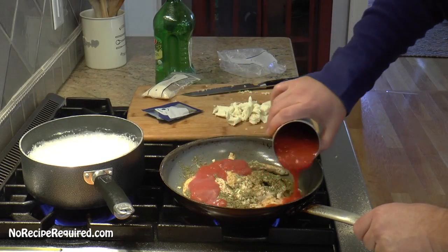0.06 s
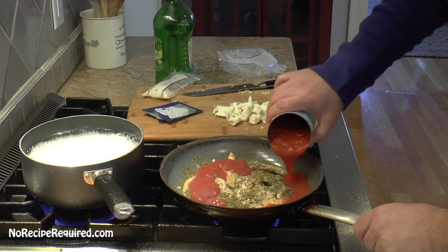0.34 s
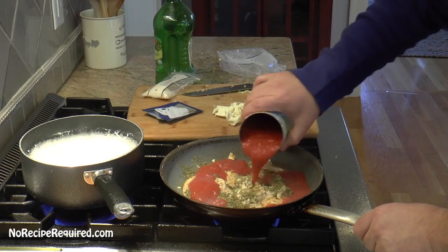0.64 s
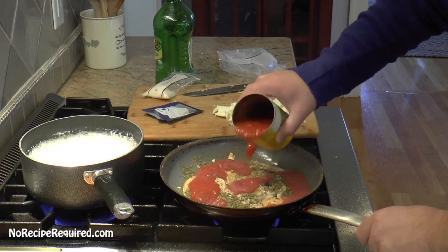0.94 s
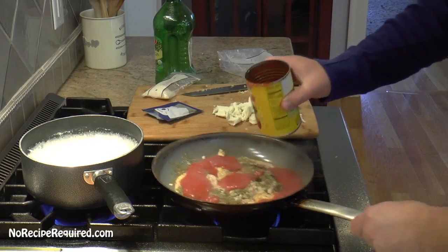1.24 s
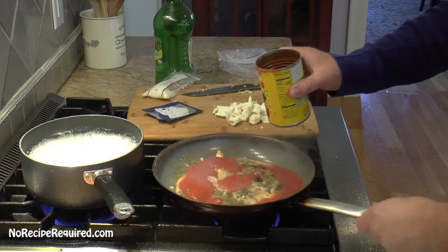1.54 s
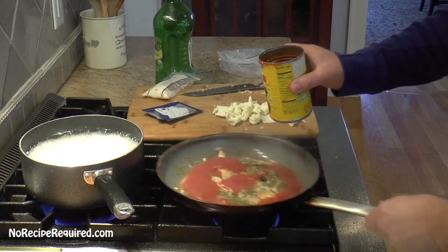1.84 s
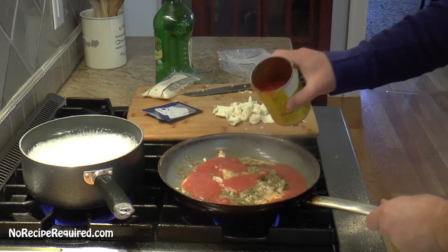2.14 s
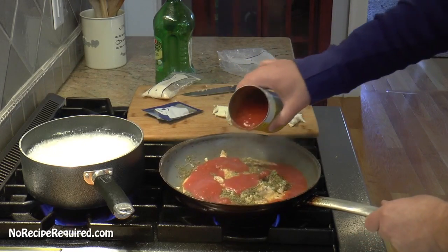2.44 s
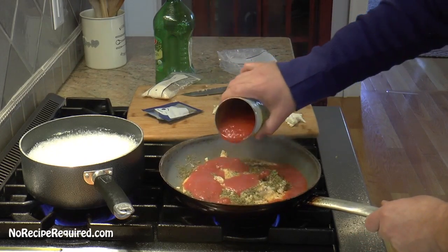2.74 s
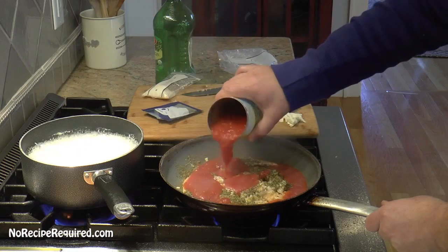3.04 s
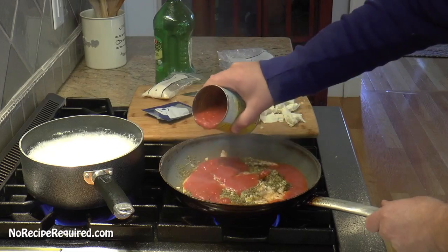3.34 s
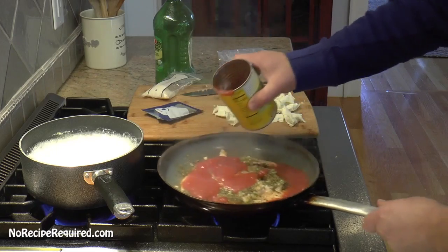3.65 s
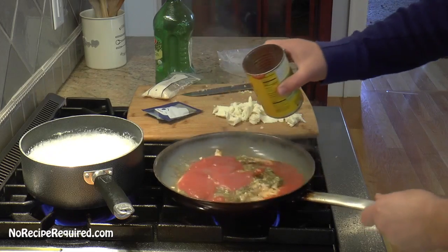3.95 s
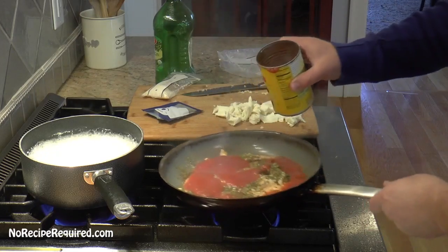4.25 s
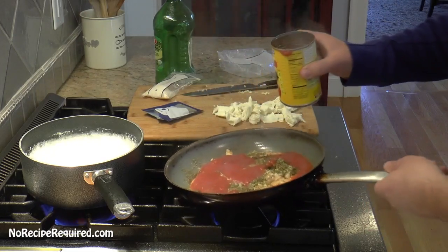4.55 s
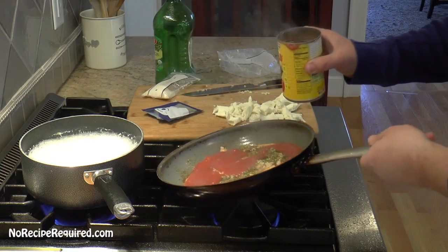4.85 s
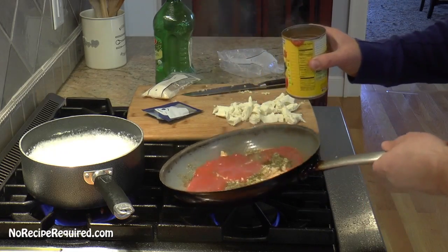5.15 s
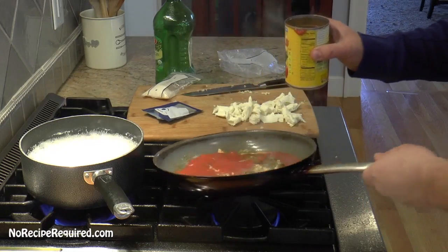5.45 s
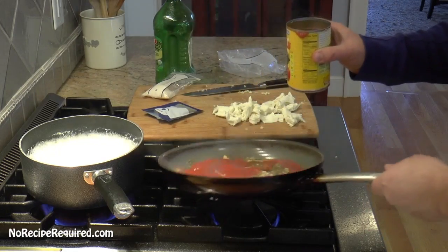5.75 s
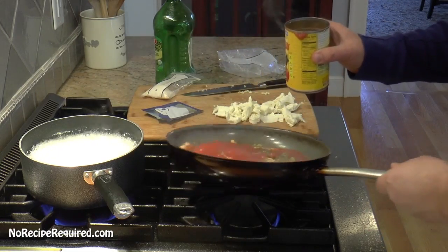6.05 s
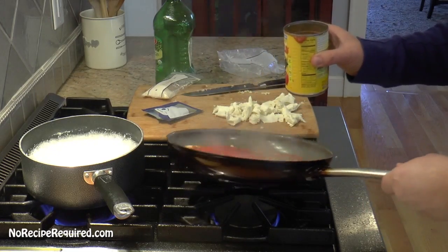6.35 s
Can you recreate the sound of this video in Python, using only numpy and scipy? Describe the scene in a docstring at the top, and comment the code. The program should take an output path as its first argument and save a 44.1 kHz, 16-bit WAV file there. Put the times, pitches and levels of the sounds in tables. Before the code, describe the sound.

A crackling sizzle of tomato pulp in hot oil dips and revives, with faint bubbling and a few metal pan knocks.

```python
"""Tomatoes in a hot skillet

Crushed tomatoes are poured twice into hot oil, beside a pot on the boil. Water flashes to steam, and
countless tiny bubbles hiss and crackle; the sizzle sinks as the pulp cools the metal and revives on
fresh hot oil. Shifted and tilted, the skillet knocks on the burner grate and rings in damped modes.
A faint hum fills the small kitchen."""
import sys
import numpy as np
from scipy import signal
from scipy.fft import rfft, irfft
from scipy.io import wavfile
from scipy.ndimage import uniform_filter1d

SR = 44100
rng = np.random.default_rng(int(sys.argv[2]) if len(sys.argv) > 2 else 0)


def transcribe(signal):
    """Save signal, clipped to [-1, 1], as a 16-bit WAV file at the path in sys.argv[1]."""
    frames = np.atleast_2d(signal).T
    limited = np.clip(frames, -1, 1)
    pcm = np.round(limited * 32767).astype(np.int16)
    wavfile.write(sys.argv[1], SR, pcm)


N = 282240
TIME, FREQS = np.arange(N) / SR, np.fft.rfftfreq(N, 1 / SR)
FRAMES, BINS = np.arange(N // 128 + 5) * 128 / SR, np.fft.rfftfreq(512, 1 / SR)  # short-time grid: s, Hz

# Strength of the sizzle, sinking under cold pulp and reviving on hot oil: time_s, level_db
SIZZLE_LEVEL = [(0.0, -33.4), (0.4, -32.3), (0.7, -33.2), (1.6, -33.8), (1.7, -35.4), (2.06, -34.7),
                (2.22, -36.7), (2.62, -38.1), (2.72, -35.5), (3.02, -37.7), (3.27, -40.6), (3.325, -35.4),
                (3.72, -34.3), (4.78, -34.5), (4.85, -35.3), (5.92, -35.4), (6.03, -33.5), (6.4, -33.9)]
# Spectrum of the bursting bubbles: frequency_hz, level_db
HISS_SPECTRUM = [(1200, -6), (1700, -5), (2200, -2.5), (2700, -0.5), (3600, -2), (4300, -2.5), (5500, -2),
                 (7300, -5.5), (8000, -4.5), (9900, -6), (11000, -10), (13300, -17.5), (15700, -20)]
# Resonances and dips of the skillet's bowl: centre_hz, width_hz, gain_db
BOWL_RESONANCES = [(1530, 140, -3), (2480, 100, -1.5), (2730, 250, 0), (3080, 230, -1), (3560, 400, 2.9),
                   (4170, 250, -1), (4710, 130, 3), (5470, 290, -2.5), (7150, 840, 2.5), (8170, 600, -1)]
# Puffs of fine spray as the pulp spreads or slides: centre_s, treble_boost_db, half_width_s
SPRAY_PUFFS = [(.19, 4.5, .08), (5.15, 2.3, .17)]
def sizzle():
    """Vaporisation: steam bubbles burst in the oil and sum to a crackling hiss, coloured by the bowl."""
    t = FRAMES[:, None]
    fresh = freshness(t)
    colour = amp(read(HISS_SPECTRUM, BINS) + humps(BOWL_RESONANCES, BINS))
    colour *= highpass(BINS, edge_hz=1530, order=5)
    colour /= band_rms(colour, low_hz=2500, high_hz=10000)
    # large wet bubbles sound low, the finest spray at the very top
    large = read([(4000, .87), (4800, 0)], BINS)
    fine = read([(9500, 0), (12500, 1)], BINS)
    muffle_db, sputter_db, spray_db = -.55 * fresh, .7 * fresh, 1.2 * fresh - .5
    spray_db += sum(db * np.exp(-((t - s) / width) ** 2) for s, db, width in SPRAY_PUFFS)
    level_db = np.interp(t, *np.transpose(SIZZLE_LEVEL)) + muffle_db
    field_db = level_db + large * sputter_db + fine * spray_db
    field_db += 1.07 * patches(frames=12, bins=4)  # bubbles cluster by size
    field_db += .45 * patches(frames=10, bins=120)  # the whole pan flutters
    crackle = amp(-3.5) * bursts(per_s=5500, spread_db=2.8)
    pops = amp(-21) * bursts(per_s=45, spread_db=3.5)
    bubbles = unit(rng.standard_normal(N) + crackle + pops)
    return sound_field(bubbles, colour * amp(field_db - .35))


def freshness(t, fresh_s=1.2, settle_s=.18):
    """Logistic decay: near 1 while the first pulp is fresh on the oil, falling to 0 as it settles."""
    return 1 / (1 + np.exp((t - fresh_s) / settle_s))


def squeals(settled_per_s=7, fresh_per_s=80):
    """Orifice tones: steam forced through pinholes in the pulp sings briefly at random pitches."""
    per_s = settled_per_s + fresh_per_s * freshness(TIME)
    times = TIME[rng.random(N) < per_s / SR]
    height, size, span = rng.random((len(times), 3)).T
    pitch_hz = 2300 + 12800 * height ** 1.3
    level_db = -44 + .5 * read(HISS_SPECTRUM, pitch_hz) + 3 * (2 * size - 1)
    half_length_s = .008 + .022 * span
    return swarms(zip(times, level_db, pitch_hz, half_length_s), relative_width=.012)


# The strongest spurts of steam: centre_s, level_db, pitch_hz, half_length_s
STEAM_SPURTS = [(.02, -35, 2470, .034), (.335, -35.5, 2960, .025), (.38, -38.5, 3940, .06),
                (.46, -37, 3900, .05), (.962, -32.5, 2780, .03), (1.08, -37, 2920, .02),
                (1.2, -39, 2680, .046), (1.38, -38, 2850, .025), (3.9, -40, 3470, .062)]
def spurts(per_s=4, level_db=-40.5, pitch_hz=2800, half_length_s=.02):
    """Pressure release: steam escapes from under the pulp, with lesser random spurts while it is fresh."""
    times = TIME[rng.random(N) < per_s * freshness(TIME) / SR]
    lesser = [(s, level_db, pitch_hz * 2 ** rng.uniform(-.2, .2), half_length_s) for s in times]
    return swarms(STEAM_SPURTS + lesser, relative_width=.098)


# Pulp landing in the pan: centre_s, relative_level_db, pitch_hz, half_length_s
PULP_LANDINGS = [(.618, -40, 1000, .025), (.71, -45.5, 1090, .14), (.83, -48, 870, 0.14),
                 (1.3, -47, 1340, 0.076)]
def splats():
    """Soft impact: each landing of pulp gives a short, broad band of noise."""
    return amp(1.6) * swarms(PULP_LANDINGS, relative_width=.25)


# Modes of the skillet on the grate: pitch_hz, level_db, t60_s
SKILLET_MODES = [(277, -4.5, 0.094), (303, -2.5, 0.11), (472, -5.5, 0.15), (520, -5.5, 0.13),
                 (576.5, -3, .13), (640.6, -3.5, .11), (690, -1, .12), (762, -2.5, 0.087),
                 (814.6, -1, 0.11), (922, -1, 0.054), (1078, -6, 0.053), (1243, -11.5, .07),
                 (1394, -14, 0.058)]
# Contacts with the grate: start_s, relative_level_db, hardness_db, rebound_gain_db
GRATE_CONTACTS = [(1.429, -32.5, -24, 2), (1.632, -33.5, 12, 1), (1.723, -24, 4, -16),
                  (1.970, -29.7, -3, 1), (3.796, -34.7, -18, -1), (3.894, -32, -12, -3),
                  (4.984, -38, -16, -6), (5.064, -31, -22, 2), (5.112, -18.3, -25, -2.5),
                  (5.211, -18.3, -28, -13), (5.754, -25.5, -14, -15)]
def knocks(usual_hardness_db=-18.5, chatter_s=.018):
    """Modal ringing: the skillet strikes, bounces twice and chatters; hard contact favours high modes."""
    out, t = np.zeros(N), TIME[:SR // 3]
    hz, mode_db, t60 = np.transpose(SKILLET_MODES)[:, :, None]
    attack = 1 - np.exp(-t / .0015)
    for s, db, hardness_db, rebound_db in GRATE_CONTACTS:
        harder_db = hardness_db - usual_hardness_db
        tilt_db = .71 * harder_db * np.log2(np.maximum(hz / 700, 1))
        contact_hz = 600 * 2 ** (.036 * harder_db)
        contact_db = 3 * np.exp(-(np.log(hz / contact_hz) / .3) ** 2)
        decays = amp(mode_db + tilt_db + contact_db - 60 * t / t60)
        # a harder contact rebounds for longer; the last bounce is shorter and weaker
        gap_s = .0225 + .00033 * harder_db
        landings = [(0, db), (gap_s, db + rebound_db), (1.8 * gap_s, db + rebound_db - 8)]
        for delay_s, blow_db in landings:
            modes = decays * np.sin(2 * np.pi * (hz * t + rng.random(hz.shape)))
            ring = modes.sum(0) * attack
            chatter = .37 * impulses(len(t), per_s=600) * np.exp(-t / chatter_s)
            blow = ring + signal.fftconvolve(ring, chatter)[:len(t)]
            add(out, s + delay_s, amp(blow_db - 9) * blow / np.std(blow[:SR // 50]))
    # the small pan radiates almost no deep bass
    radiated = signal.sosfilt(signal.butter(3, 200, "high", fs=SR, output="sos"), out)
    return kitchen(radiated, t60_s=.22, wet_db=-13)


# The stove top takes the skillet's weight: time_s, peak_db
STOVE_THUDS = [(2.011, -45), (5.118, -29.5)]
def thuds(pitch_hz=240, length_s=.0162):
    """Heavy damping: the loaded stove top swings for only a few cycles."""
    out, swell = np.zeros(N), np.hanning(int(length_s * SR))
    push = np.sin(2 * np.pi * pitch_hz * TIME[:len(swell)]) * swell
    for s, db in STOVE_THUDS:
        add(out, s - length_s / 4, amp(db) * push)
    return kitchen(out, t60_s=.15, wet_db=-18)


# Strength of the boiling pot and simmering pulp: time_s, relative_level_db
SIMMER_LEVEL = [(0, -46.5), (1.0, -45), (1.95, -46), (2.25, -50), (2.85, -49), (3.2, -52), (3.85, -43.7),
                (4.85, -47.5), (6.4, -46)]
# Spectrum of the bubbling and the burners: frequency_hz, level_db
BOIL_SPECTRUM = [(18, -66), (30, -40), (91, -21.5), (106, -22), (120, -8), (152, -10.5), (236, -7),
                 (284, -1), (425, -5), (558, -0.5), (617, -3.5), (808, 0), (880, -4.5), (1040, 0.5),
                 (1700, -2), (2210, -24), (3740, -120)]
# Resonances of the pot and stove top: centre_hz, width_hz, gain_db
POT_RESONANCES = [(297, 56, 2), (468, 19, 2.5), (567, 28, 3), (686, 50, 5), (824, 40, 4.5), (940, 35, 3),
                  (1023, 32, 2.5), (1190, 56, 4), (1415, 29, 8.5)]
def simmer():
    """Resonant filtering: the pot colours low bubbling and the rush of the burners."""
    colour = amp(read(BOIL_SPECTRUM, FREQS) + humps(POT_RESONANCES, FREQS))
    colour /= 1 + (FREQS / 1650) ** 10
    bubbles = unit(rng.standard_normal(N) + amp(-7) * bursts(per_s=260, spread_db=3))
    direct, diffuse = (unit(irfft(rfft(v) * colour, N)) for v in (bubbles, rng.standard_normal(N)))
    stereo = direct + amp(-14.5) * np.array([diffuse, -diffuse])
    return stereo * amp(np.interp(TIME, *np.transpose(SIMMER_LEVEL)) - .64)


def hum(pitch_hz=125.5, waver_hz=3.43, level_db=-72.5):
    """Modulation: a faint tone wavers in pitch, and sinks and swells with the low bubbling."""
    waver = np.interp(TIME, FRAMES, patches(frames=40, bins=1)[:, 0])
    tone = unit(np.sin(2 * np.pi * np.cumsum(pitch_hz + waver_hz * waver) / SR))
    simmer_db = np.interp(TIME, *np.transpose(SIMMER_LEVEL))
    return amp(level_db + 1.1 * (simmer_db - simmer_db.mean())) * tone


def reflections(x, count):
    """Comb filtering: faint echoes off the hob, pot and wall ripple the spectrum."""
    delay_s = rng.uniform(.002, .012, (count, 1))
    comb_db = .9 * unit(np.cos(2 * np.pi * FREQS * delay_s).sum(0))
    return irfft(rfft(x) * amp(comb_db), N)


def kitchen(x, t60_s, wet_db):
    """Reverberation: a small hard room adds a short tail, partly shared by left and right."""
    t = TIME[:SR // 2]
    echoes = impulses((3, len(t)), per_s=2000) * (t > .004)
    tails = (echoes[:2] + echoes[2]) * amp(-60 * t / t60_s)
    tails /= np.linalg.norm(tails[0])
    return x + amp(wet_db) * signal.fftconvolve(x[None], tails, axes=1)[:, :N]


# Likeness of the sizzle at left and right: frequency_hz, coherence
COHERENCE = [(60, .75), (250, .93), (1400, .85), (2100, .99), (4200, .994), (5400, .999), (6800, .997),
             (9000, .985), (12700, .97), (14000, .45)]
def sound_field(source, gain):
    """Partial coherence: direct sound and diffuse noise form a stereo pair under one moving spectrum."""
    window = dict(nperseg=512, noverlap=384)
    direct, diffuse = (signal.stft(np.pad(v, (0, 1024)), **window)[2].T[:len(FRAMES)]
                       for v in (source, rng.standard_normal(N)))
    coherence = np.clip(read(COHERENCE, BINS), 0, 1)
    mid, side = direct * np.sqrt((1 + coherence) / 2), diffuse * np.sqrt((1 - coherence) / 2)
    spectra = np.array([mid + side, mid - side]) * gain
    return signal.istft(spectra.transpose(0, 2, 1), **window)[1][:, :N]


def swarms(rows, relative_width):
    """Superposition: bubbles ringing near one pitch sum to a band of noise that swells and fades."""
    out = np.zeros(N)
    for centre_s, level_db, pitch_hz, half_length_s in rows:
        swell = np.hanning(int(2 * half_length_s * SR))
        hz = np.fft.rfftfreq(len(swell), 1 / SR)
        band = np.exp(-((hz / pitch_hz - 1) / relative_width) ** 2)
        swarm = irfft(rfft(rng.standard_normal(len(swell))) * band, len(swell))
        add(out, centre_s - half_length_s, amp(level_db) * unit(swarm) * swell)
    return out


def bursts(per_s, spread_db):
    """Shot noise: bubbles burst at random, in many small clicks and a few large."""
    size = amp(spread_db * np.minimum(rng.exponential(1, N), 4.5)) * rng.choice([-1, 1], N)
    return unit(size * (rng.random(N) < per_s / SR))


def impulses(shape, per_s):
    """Poisson train of impulses with Gaussian heights."""
    return rng.standard_normal(shape) * (rng.random(shape) < per_s / SR)


def patches(frames, bins):
    """Random field of rms 1, smoothed over time and frequency."""
    field = uniform_filter1d(rng.standard_normal((len(FRAMES), len(BINS))), frames, axis=0)
    return unit(uniform_filter1d(field, bins, axis=1, mode="wrap"))


def humps(resonances, hz):
    """Decibels that resonances add to a spectrum."""
    return sum(db * np.exp(-(2 * (hz - centre) / width) ** 2) for centre, width, db in resonances)


def highpass(hz, edge_hz, order):
    """Gain of a maximally flat high-pass."""
    return 1 / np.sqrt(1 + (edge_hz / (hz + 1)) ** (2 * order))


def band_rms(gain, low_hz, high_hz):
    """Rms within a band of unit noise filtered by gain."""
    return np.sqrt(np.mean(gain ** 2 * (BINS > low_hz) * (BINS < high_hz)))


def read(points, hz):
    """Interpolation on a log-frequency axis."""
    point_hz, value = np.transpose(points)
    return np.interp(np.log(hz + 1), np.log(point_hz + 1), value)


def amp(db):
    """Decibels to gain."""
    return 10 ** (np.asarray(db) / 20)


def unit(x):
    """Normalisation to rms 1."""
    return x / np.sqrt(np.mean(x ** 2) + 1e-20)


def add(mix, start_s, sound):
    """Sums a sound into the mix."""
    part = mix[max(round(start_s * SR), 0):][:len(sound)]
    part += sound[:len(part)]


def scene():
    """Superposition: all the sources add, nearly straight ahead on the stove."""
    frying = splats() + reflections(sizzle(), count=24) + squeals()
    return frying + simmer() + spurts() + knocks() + thuds() + hum()


# Level of the left channel over the right: frequency_hz, difference_db
LEVEL_DIFFERENCE = [(50, -1), (110, -3.2), (250, -3), (500, 1), (950, 2.5), (1500, 1.8), (2100, .1),
                    (3100, .7), (5300, 0), (7500, .1), (9500, 2.4), (12000, 3), (14500, 5)]
# Phase of the left channel ahead of the right: frequency_hz, lead_rad
PHASE_DIFFERENCE = [(0, -0.14), (690, 0.4), (1290, 0.043), (12900, 0.0), (14600, -0.3), (16500, -0.3)]
def record(dry, cutoff_hz=15850):
    """Spaced pickup: two close microphones differ in level and phase, and share one band limit."""
    left = amp(read(LEVEL_DIFFERENCE, FREQS) / 2) * np.exp(1j * read(PHASE_DIFFERENCE, FREQS) / 2)
    stereo = irfft(rfft(dry) * np.array([left, 1 / left]), N)
    lowpass = signal.firwin(801, cutoff_hz, window=("kaiser", 9), fs=SR)
    return signal.oaconvolve(stereo, lowpass[None], "same")


dry = scene()
out = record(dry)
transcribe(out)
```